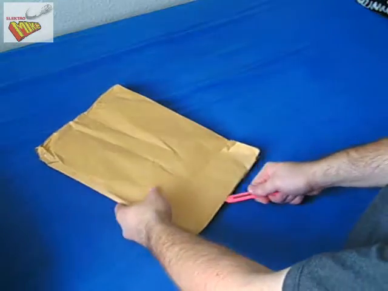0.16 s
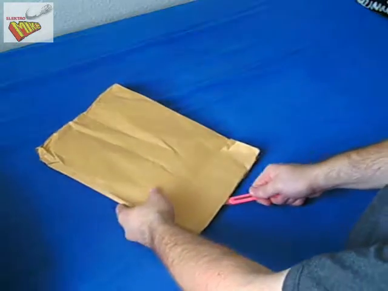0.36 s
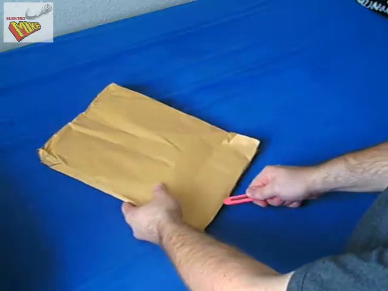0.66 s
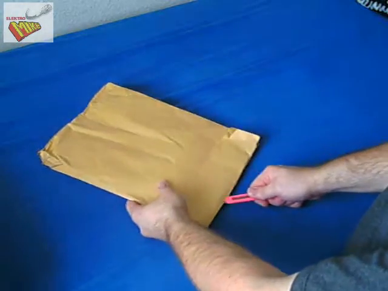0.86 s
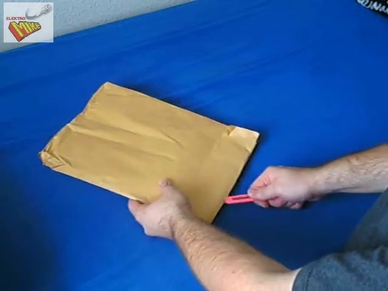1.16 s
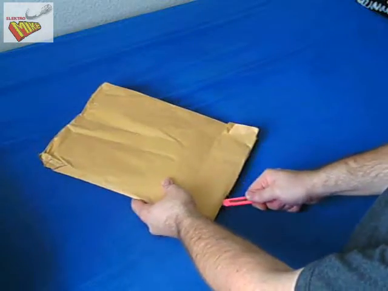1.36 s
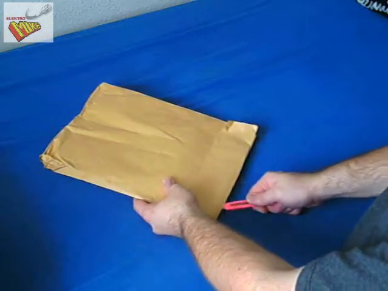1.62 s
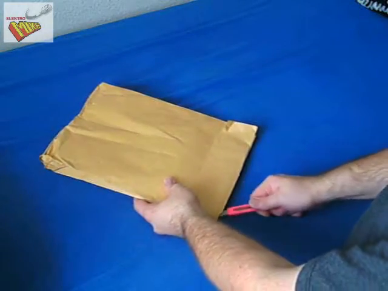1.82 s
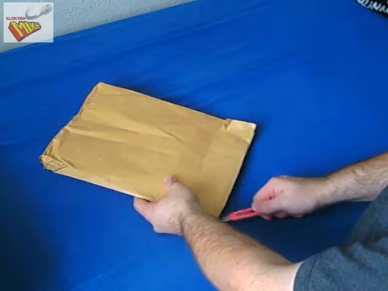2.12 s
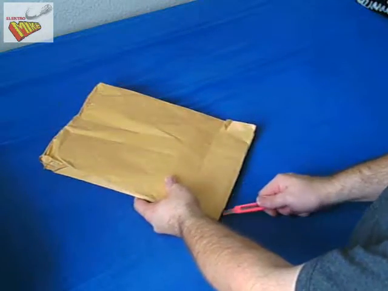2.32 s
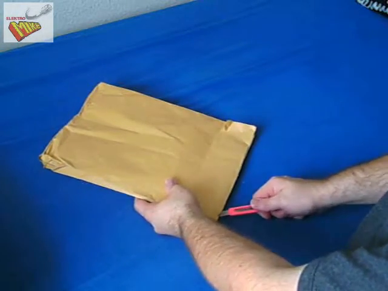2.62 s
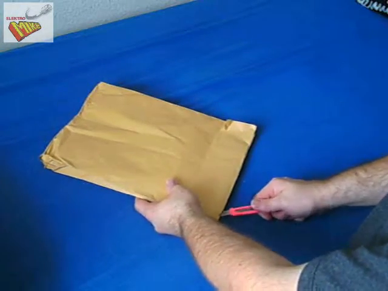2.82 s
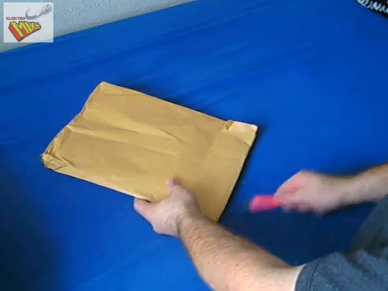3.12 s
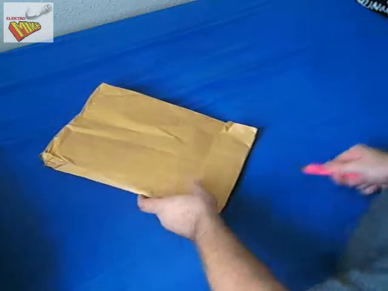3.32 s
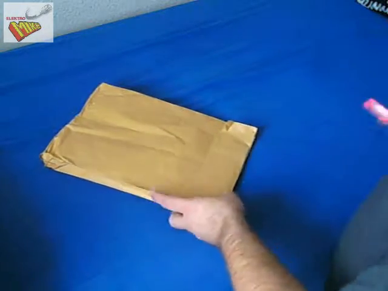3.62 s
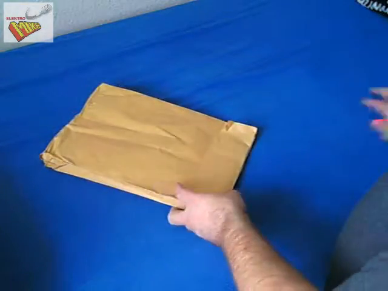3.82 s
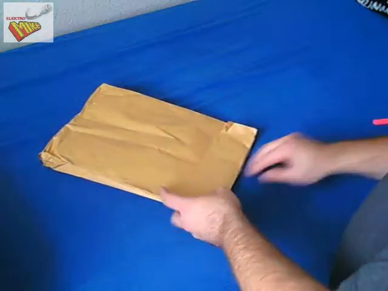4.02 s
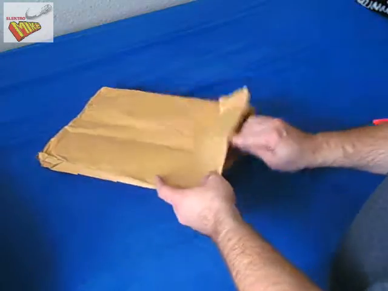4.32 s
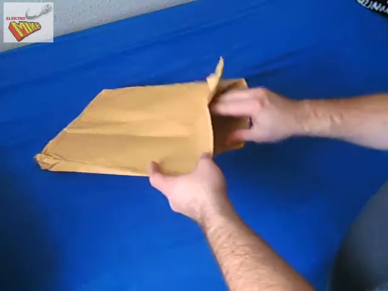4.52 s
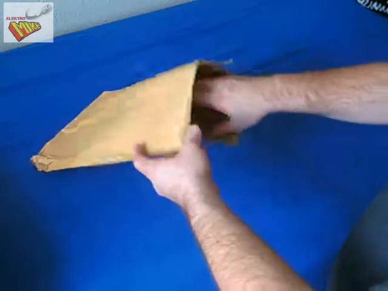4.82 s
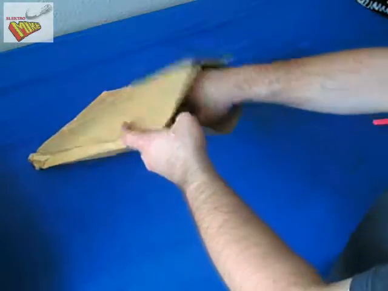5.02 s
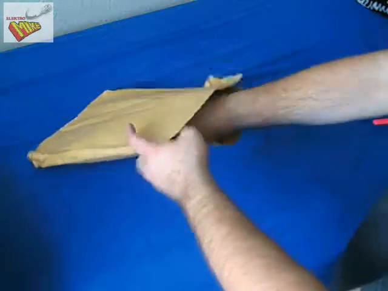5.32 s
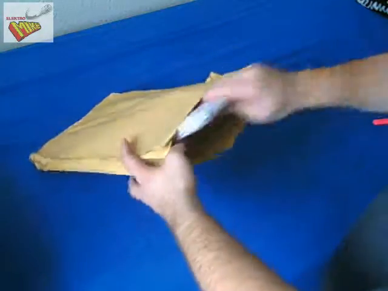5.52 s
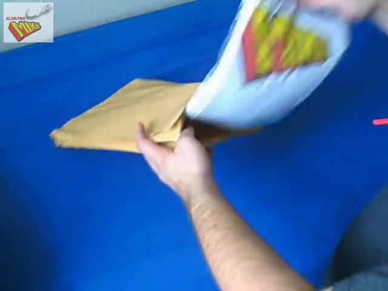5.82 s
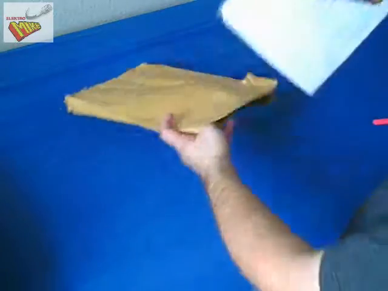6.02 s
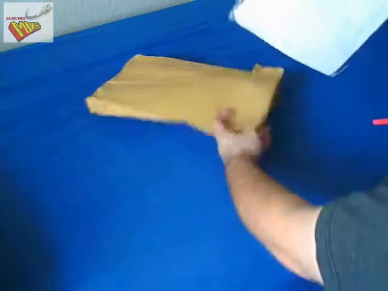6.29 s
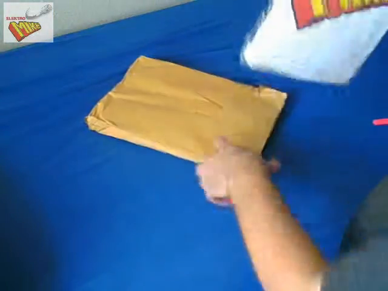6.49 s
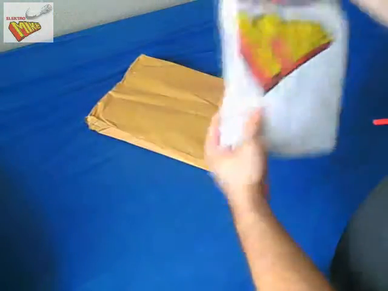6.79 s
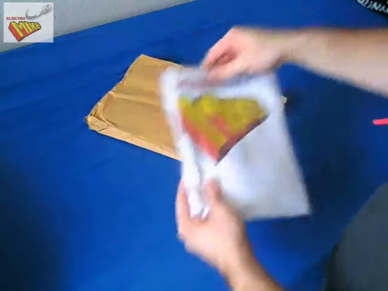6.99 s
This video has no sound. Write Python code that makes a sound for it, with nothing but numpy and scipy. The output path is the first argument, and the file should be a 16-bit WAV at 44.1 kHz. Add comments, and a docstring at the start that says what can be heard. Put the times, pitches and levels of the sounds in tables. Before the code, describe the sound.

For the first two seconds, a knife slits a paper envelope in short, scratchy strokes, several a second, with small crease snaps and the hardest cuts near the end. It goes quieter, with a few faint scratches, until the blade breaks through with a dull knock at about 3 seconds. Around 3.4 to 3.7 seconds, the knife's plastic slider retracts in about ten loud, bright clicks. Hands rub and crinkle the paper from 4 seconds, and the envelope buckles with loud pops between 4.8 and 5.1. From 5.4 to 6.1 seconds, a plastic bag slides out in one continuous rustle. Sharp crackles come at 6.2, then soft flaps, dull knocks and crinkling plastic until just after 7 seconds. The room is small, with a short echo. The microphone cuts off the treble and adds low steady hiss and a faint electronic whine.

```python
"""Opening a paper envelope

In a small room, on a cloth-covered table, a knife slits an envelope in short strokes that tear the
paper fibres. The blade clicks back into its handle. A hand pushes in, the envelope buckles open with
loud pops, and a garment in a plastic bag slides out, rustling. The microphone cuts off the treble
and adds hiss and a faint whine."""
import sys
import numpy as np
from scipy import signal
from scipy.io import wavfile

SR = 44100
rng = np.random.default_rng(int(sys.argv[2]) if len(sys.argv) > 2 else 0)


def generate_wav(sig):
    """Save sig (samples, or channels by samples) to the path in sys.argv[1] as 16-bit PCM at SR."""
    pcm = np.round(np.clip(np.atleast_2d(sig).T, -1, 1) * 32767).astype(np.int16)
    wavfile.write(sys.argv[1], SR, pcm)


N = 315315

# Knife strokes through the fold: t/s, length/s, average level/dB
KNIFE_STROKES = [(0.037, 0.057, -43), (0.203, 0.04, -51.5), (0.311, .045, -41), (0.457, 0.045, -46),
                 (0.554, 0.031, -40), (0.661, 0.073, -47.5), (0.768, 0.068, -43.5), (0.921, 0.041, -43),
                 (1.018, 0.045, -39.5), (1.179, 0.046, -46.5), (1.274, .032, -31.5), (1.391, 0.028, -47),
                 (1.495, 0.054, -29), (1.612, 0.05, -43.5), (1.746, 0.04, -26), (1.953, 0.013, -48.5),
                 (2.002, .016, -30.5), (2.033, 0.017, -40), (2.454, 0.026, -46.5), (2.806, 0.018, -43),
                 (2.905, 0.02, -44), (2.961, 0.046, -46), (3.043, 0.0097, -31.5), (3.057, .016, -34)]
# The blade's slider jumping its notches:
# t/s, peak level/dB, ring f/Hz, ring width/Hz, handle f/Hz, handle level against the ring/dB
SLIDER_CLICKS = [(3.4473, -14, 3840, 604, 2300, -1), (3.4557, -12.5, 3820, 482, 2300, -10),
                 (3.4734, -14, 3700, 750, 2050, 2), (3.4816, -10, 3600, 850, 1950, 1.5),
                 (3.5183, -12, 3580, 900, 2200, -1), (3.5497, -11, 2800, 1200, 2200, -25),
                 (3.5767, -11.5, 2810, 995, 2200, -22.5), (3.595, -2, 3090, 734, 2200, -28),
                 (3.6092, -6.5, 2870, 693, 2200, -24), (3.639, -7.5, 2880, 940, 1950, -2.5)]
# Pops and softer flaps of the envelope wall (more tilt sounds brighter):
# t/s, length/s, average level/dB, tilt/(dB per octave), panel f/Hz, panel level/dB
POPS_AND_FLAPS = [(4.791, 0.0087, -31.5, 6.5, 2550, -38.5), (4.797, 0.015, -30, -2.5, 698, -52),
                  (4.814, 0.024, -17, 2.5, 621, -29), (4.876, 0.041, -40.5, -2, 647, -51),
                  (4.938, 0.0067, -27, 0, 3200, -22.5), (4.943, 0.019, -26.5, 2.5, 670, -28.5),
                  (5.015, 0.0047, -22, 1, 600, -33), (5.026, 0.012, -37, 0.5, 588, -31),
                  (5.05, 0.0083, -29, -0.5, 1780, -29), (5.75, 0.031, -41, -3, 1117, -42),
                  (5.917, 0.046, -38.5, -3, 752, -55.5), (6.146, 0.03, -47.5, -6.5, 699, -51.5),
                  (6.448, 0.027, -38.5, -2.5, 1502, -47.5)]
# The loudest creases in paper and plastic: t/s, peak level/dB, tilt/(dB per octave)
CREASE_SNAPS = [(0.177, -22.5, -2), (0.316, -28.5, -1), (0.459, -20, -0.5), (0.675, -16.5, 6),
                (0.683, -22.5, -6), (0.712, -20.5, -3), (0.976, -22.5, -4), (1.419, -23.5, 1.5),
                (1.632, -18, 3), (1.648, -19, 3), (1.758, -16, 3.5), (2.176, -42, 4), (2.674, -40, 1),
                (3.806, -30.5, 11), (3.969, -39.5, 0), (4.182, -32, -4), (4.255, -26.5, -3.5),
                (4.329, -22, -2.5), (4.366, -20, -1.5), (5.171, -18.5, -0.5), (5.346, -30.5, -2.5),
                (5.545, -24.5, 9), (6.189, -21, -1.5), (6.206, -16.5, -2.5), (6.774, -31, 9.5),
                (6.848, -28.5, 3), (6.96, -25, 3.5), (7.067, -26.5, -3)]
# Hands gripping, reaching in, laying the envelope down and turning the bag over:
# t/s, length/s, average level/dB, dull share/dB
HAND_SLIDES = [(0.0, 0.11, -51.5, -1.5), (0.683, 0.61, -59, -1.5), (2.81, 0.3, -61, -3),
               (3.717, 0.14, -55.5, -2), (4.136, 0.086, -51, -5), (4.275, 0.14, -45.5, -2.5),
               (4.407, 0.41, -54.5, -3), (4.546, 0.042, -46.5, -4.5), (4.656, 0.079, -50.5, -5.5),
               (5.102, 0.15, -47, -1.5), (5.274, 0.11, -51, -8), (6.106, 0.15, -45, -3),
               (6.28, 0.077, -53, -5), (6.393, 0.16, -52, -3), (6.743, 0.086, -54, -6),
               (6.845, 0.13, -44.5, -7), (7.035, 0.098, -48, -5)]
# The long pull that draws the bag out: t/s, average level/dB
BAG_PULL = [(5.39, -51), (5.43, -43), (5.51, -45), (5.571, -40.5), (5.77, -39.5), (5.89, -41.5),
            (5.955, -42), (6.0, -49.5), (6.102, -50.5)]
# Soft, dull knocks of the handling, and the blade breaking through the fold: t/s, peak level/dB, f/Hz
DULL_KNOCKS = [(2.247, -38, 884), (3.064, -28, 650), (3.287, -35.5, 810), (3.563, -34, 700),
               (3.703, -32.5, 1100), (4.116, -42.5, 880), (4.765, -34.5, 1102), (6.392, -31, 840),
               (6.604, -39.5, 764)]
# Pitches at which the envelope rings: f/Hz, width/Hz, boost at full strength/dB
ENVELOPE_RINGS = [(655, 80, 8), (882, 60, 3.5), (1140, 80, 5), (1570, 60, 3), (1828, 60, 6), (1960, 50, 3),
                  (2160, 70, 4), (2525, 90, 6), (2850, 60, 2), (3070, 70, 3), (3635, 90, 4)]
# Tone colours of tearing, popping, sliding and hiss: f/Hz, relative level/dB
TEAR_COLOUR = [(40, -18.5), (130, -30.5), (250, -14), (450, -9), (900, -4.5), (1500, -4.5), (2500, -1),
               (3200, -0.5), (3900, -3.5)]
POP_COLOUR = [(40, -19), (130, -18), (250, -13.5), (420, -7.5), (600, -3.5), (900, 2.5), (1400, 0),
              (1900, 2.5), (2700, -2), (3300, -2), (3900, -4)]
SLIDE_COLOUR = [(40, -20.5), (130, -22), (250, -8.5), (400, -4), (700, 1.5), (1100, 2.5), (1700, -3.5),
                (2500, -2), (3300, 1), (3900, -3.5)]
HISS_COLOUR = [(20, 2.5), (60, -2.5), (130, 0.5), (250, 1), (500, 2), (1100, -2), (1600, -1.5), (2200, -2),
               (3000, 0), (3900, -4.5)]
# Tone colour of the knife, too small to give off much bass: f/Hz, relative level/dB
KNIFE_COLOUR = [(100, -13.5), (1300, -15), (1950, -4.0), (3900, -0.5), (5500, 11.0)]
# Steady tones of the electronic whine: f/Hz, average level/dB
WHINE_TONES = [(2078, -73.5), (2676, -77.5), (2972, -67.5), (3268, -77), (3564, -71), (3860, -76)]
# Faint high fizz that leaks through above the band's end: f/Hz, gain/dB
HIGH_FIZZ = [(3900, -31.5), (4400, -39), (5500, -50), (7000, -56.5), (9000, -60), (13000, -58),
             (16000, -70.5)]

MIC_TOP_HZ = 3920  # the microphone's band ends here
MIC_FILTER = signal.firwin(801, MIC_TOP_HZ, window=("kaiser", 8), fs=SR)
TAPS = 4096
HZ = np.fft.rfftfreq(TAPS, 1 / SR) + 1  # the frequencies on which tone colours are drawn
TIME = np.arange(N) / SR


def cutting():
    """Each push of the blade tears fibres, brighter when harder; the blade also rubs in the slit."""
    rub_end_s, fall_s, hard_stroke_db = 1.98, 0.0065, -28
    grain = fibres(N, per_s=8000, spread_db=2.0) * catching(step_s=0.006, depth_db=0.5)
    rub = filtered(grain, colour(TEAR_COLOUR, ring=0.41, tilt=4.5))[:N]
    out = at_rms(rub, db=-57.5) * np.clip((rub_end_s - TIME) / fall_s, 0, 1)
    spots = rng.standard_normal((len(KNIFE_STROKES), 64))  # each spot of the fold has its own tone
    for (s, length, db), spot in zip(KNIFE_STROKES, spots):
        tilt = 1.27 + 0.066 * (db - hard_stroke_db)
        spot_db = 2 * np.interp(HZ / 351, np.arange(len(spot)), spot)  # a new boost or dip every 351 Hz
        push = burst(grain, s, length, rise_s=0.0057, fall_s=fall_s)
        tear = filtered(push, colour(TEAR_COLOUR, ring=0.6, tilt=tilt) + spot_db)
        add(out, s, at_rms(tear, db, length))
    return out


def buckling():
    """The envelope wall pops or flaps in a rush of creases; small panels ring high, large ones boom."""
    out = np.zeros(N)
    grain = fibres(N, per_s=4500, spread_db=2.0)
    noise = rng.standard_normal(N)
    for s, length, db, tilt, panel_hz, panel_db in POPS_AND_FLAPS:
        crumple = burst(grain, s, length, rise_s=0.00083, fall_s=0.0083)
        wall = filtered(crumple, colour(POP_COLOUR, ring=0.59, tilt=tilt))
        push = burst(noise, s, length, rise_s=0.000984, fall_s=0.004)
        panel = filtered(push, 20 * np.log10(resonance(panel_hz, width_hz=panel_hz / 4)))
        add(out, s, at_rms(wall, db, length) + at_rms(panel, panel_db, length))
    return out


def ratcheting():
    """The knife's plastic slider clicks brightly at each notch, and the handle rings lower."""
    out = np.zeros(N)
    knife_db = np.interp(HZ, *np.transpose(KNIFE_COLOUR))
    for s, db, hz, width_hz, handle_hz, handle_db in SLIDER_CLICKS:
        handle = amp(handle_db) * resonance(handle_hz, width_hz=380)
        ring = np.hypot(resonance(hz, width_hz), handle)
        click = filtered(np.ones(1), 20 * np.log10(ring + 0.041) + knife_db)
        add(out, s, at_peak(click, db))
    return out


def snapping():
    """Single creases flip over, each with a sharp snap."""
    out = np.zeros(N)
    for s, db, tilt in CREASE_SNAPS:
        flip = crack(flutter=0.099, decay_s=0.0049)
        snap = filtered(flip, colour(TEAR_COLOUR, ring=0.85, tilt=tilt))
        add(out, s, at_peak(snap, db))
    return out


def rustling():
    """Sliding surfaces catch, slip and flip small creases; paper sounds dull, the plastic bag bright."""
    grain = fibres(N, per_s=5500, spread_db=3) * catching(step_s=0.0075, depth_db=1.3)
    rub = filtered(grain, colour(SLIDE_COLOUR, ring=0.33))[:N]
    dull = lowpass(rub, hz=1400)
    dull_power, bright_power = sliding_power()
    paper = np.sqrt(dull_power) * at_rms(dull, db=0)
    plastic = np.sqrt(bright_power) * at_rms(rub - dull, db=0)
    clicks = fibres(N, per_s=28, spread_db=0.5)
    flips = signal.oaconvolve(clicks, crack(flutter=0.13, decay_s=0.0047))
    creases = filtered(flips, colour(TEAR_COLOUR, ring=0.67, tilt=-1.6))[:N]
    return paper + plastic + np.sqrt(dull_power + bright_power) * at_rms(creases, db=-11.5)


def sliding_power():
    """How strong the dull and the bright rustle are over time, as the hands move."""
    pull_s, pull_db = np.transpose(BAG_PULL)
    pull = amp(np.interp(TIME, pull_s, pull_db)) * (TIME > pull_s[0]) * (TIME < pull_s[-1])
    moves = [(pull, -6.5)]  # level over time, dull share in dB
    for s, length, db, dull_db in HAND_SLIDES:
        t = np.maximum(TIME - s, 0)
        arch_db = 3 * (np.sin(np.pi * np.minimum(t / length, 1)) - 2 / np.pi)  # fastest midway
        moves.append((amp(db + arch_db) * swell(t, length, rise_s=0.0058, fall_s=0.023), dull_db))
    dull = sum((level * amp(dull_db)) ** 2 for level, dull_db in moves)
    total = sum(level ** 2 for level, _ in moves)
    return dull, total - dull


def knocking():
    """Soft, dull knocks of the handling, and the blade breaking through the fold."""
    out = np.zeros(N)
    for s, db, hz in DULL_KNOCKS:
        muffle_db = -20 * np.log10(1 + (np.log2(HZ / hz) / 0.61) ** 2)
        knock = filtered(crack(flutter=0.1, decay_s=0.008), muffle_db)
        add(out, s, at_peak(knock, db))
    return out


def room(x, tail_db, tail_s, near_db):
    """Sound bounces quickly off table and wall, then dies away in the room's short tail."""
    t = TIME[:SR // 2]
    near, tail = rng.choice([-1., 1.], (2, len(t))) * (rng.random((2, len(t))) < 4000 / SR)
    near *= (t > 0.003) * amp(-60 * t / 0.088)
    tail *= (t > 0.008) * amp(-60 * t / tail_s)
    echoes = amp(near_db) * near / np.linalg.norm(near) + amp(tail_db) * tail / np.linalg.norm(tail)
    return x + signal.oaconvolve(x, echoes)[:N]


def hiss_and_whine():
    """The microphone's own steady hiss and faint electronic whine."""
    hiss = filtered(rng.standard_normal(N + TAPS), colour(HISS_COLOUR))[TAPS:N + TAPS]
    whine = sum(amp(db) * np.sin(2 * np.pi * (hz * TIME + rng.random())) for hz, db in WHINE_TONES)
    return at_rms(hiss, db=-59) + np.sqrt(2) * whine


def fibres(count, per_s, spread_db):
    """Fibres slip and break as tiny random clicks; more spread makes a few stand out."""
    chance, size, sign = rng.random((3, count))
    hit = chance < per_s / SR
    size_db = spread_db * np.minimum(-np.log(1 - size[hit]), 4)
    clicks = np.zeros(count)
    clicks[hit] = np.sign(sign[hit] - 0.5) * amp(size_db)
    return clicks


def catching(step_s, depth_db):
    """The wavering level of a surface that catches and slips."""
    grip = rng.standard_normal(8000)
    return amp(depth_db * np.interp(TIME / step_s, np.arange(len(grip)), grip))


def crack(flutter, decay_s):
    """One sharp click, then a brief flutter of the sheet."""
    t = TIME[:TAPS]
    return (t == 0) + flutter * rng.standard_normal(TAPS) * np.exp(-t / decay_s)


def swell(t, length, rise_s, fall_s):
    """A level that rises, holds and dies away."""
    return (1 - np.exp(-t / rise_s)) * np.exp(-np.maximum(t - length, 0) / fall_s)


def burst(grain, s, length, rise_s, fall_s):
    """A short piece of noise, taken at time s and faded in and out."""
    t = TIME[:int(0.2 * SR)]
    return grain[round(s * SR):][:len(t)] * swell(t, length, rise_s, fall_s)


def resonance(hz, width_hz):
    """The gain curve of something that rings at one pitch."""
    return 1 / (1 + ((HZ - hz) / width_hz) ** 2)


def colour(points, ring=0, tilt=0):
    """A tone colour in dB: a broad shape, some of the envelope's ringing and a tilt per octave."""
    f, db = np.transpose(points)
    rings_db = sum(boost * resonance(hz, width / 2) for hz, width, boost in ENVELOPE_RINGS)
    octaves = np.log2(np.clip(HZ, 300, MIC_TOP_HZ) / MIC_TOP_HZ)
    return np.interp(np.log(HZ), np.log(f), db) + ring * rings_db + tilt * octaves


def filtered(x, db):
    """Gives a sound a tone colour, with an average power gain of one in the microphone's band."""
    gain = amp(db) / np.sqrt(np.mean(amp(db)[HZ < MIC_TOP_HZ] ** 2))
    log_gain = np.log(np.maximum(np.r_[gain, gain[-2:0:-1]], 1e-5))
    spectrum = np.exp(np.conj(signal.hilbert(log_gain)))  # rings after a click, never before it
    return signal.oaconvolve(x, np.fft.ifft(spectrum).real[:TAPS // 2])


def lowpass(x, hz):
    """Cuts away the treble above hz, with no delay."""
    return signal.oaconvolve(x, signal.firwin(801, hz, window=("kaiser", 8), fs=SR), "same")


def at_rms(x, db, length=N / SR):
    """Sets the average level in the microphone's band, as if the sound lasted length seconds."""
    energy = np.sum(signal.fftconvolve(x, MIC_FILTER) ** 2)
    return x * amp(db) * np.sqrt(length * SR / (energy + 1e-20))


def at_peak(x, db):
    """Sets the peak level in the microphone's band."""
    return x * amp(db) / abs(signal.fftconvolve(x, MIC_FILTER)).max()


def amp(db):
    """Turns decibels into a gain."""
    return 10 ** (np.asarray(db) / 20)


def add(mix, s, sound):
    """Lays a sound into the mix at time s."""
    part = mix[round(s * SR):][:len(sound)]
    part += sound[:len(part)]


def scene():
    """All the handling, with the room's echoes, over hiss and whine."""
    paper = room(cutting() + rustling(), tail_db=-9.5, tail_s=0.33, near_db=-17.5)
    pops_and_flaps = room(buckling(), tail_db=-9, tail_s=0.24, near_db=-9)
    snaps_and_knocks = room(snapping() + knocking(), tail_db=-6.5, tail_s=0.39, near_db=-4.5)
    knife = room(ratcheting(), tail_db=-10, tail_s=0.29, near_db=-4.5)
    return (paper + pops_and_flaps + snaps_and_knocks + knife + hiss_and_whine())[None]


def record(dry):
    """The microphone cuts the treble; a faint fizz sounds above it, and a tick tops the loudest pop."""
    high_whine_hz, tick_s, zero_offset = 8000, 4.8328, -0.0067
    fizz_gain = amp(colour(HIGH_FIZZ)) * (HZ > MIC_TOP_HZ)
    fizz_filter = signal.firwin2(513, np.linspace(0, 1, len(HZ)), fizz_gain)
    out = lowpass(dry[0], MIC_TOP_HZ) + signal.oaconvolve(dry[0], fizz_filter, "same")
    out += amp(-99) * np.sin(2 * np.pi * high_whine_hz * TIME)
    add(out, tick_s, -amp([-1]))  # the tick is a single sample
    return lowpass(out, hz=16000)[None] + zero_offset


dry = scene()
out = record(dry)
generate_wav(out)
```